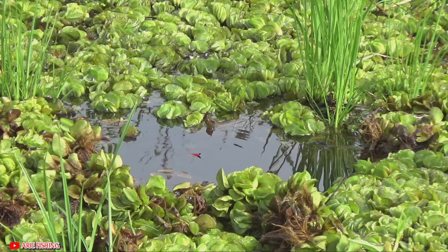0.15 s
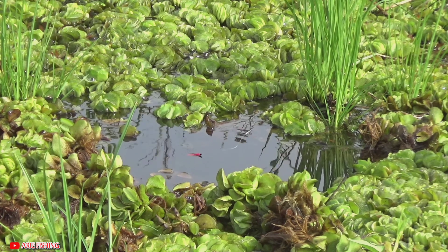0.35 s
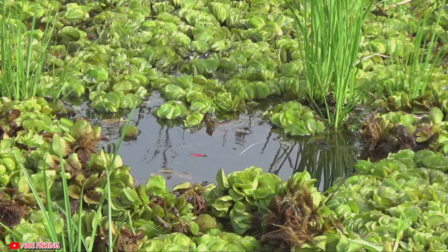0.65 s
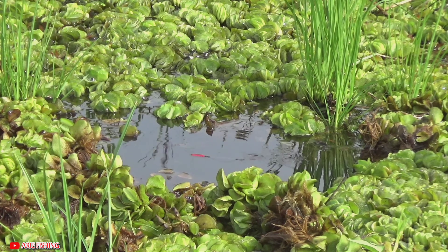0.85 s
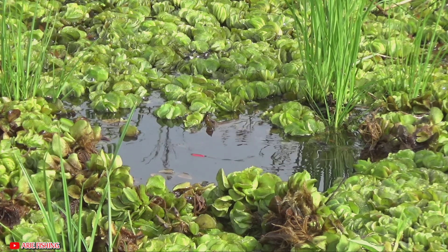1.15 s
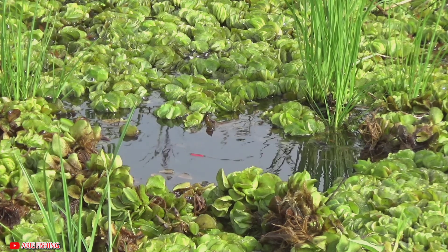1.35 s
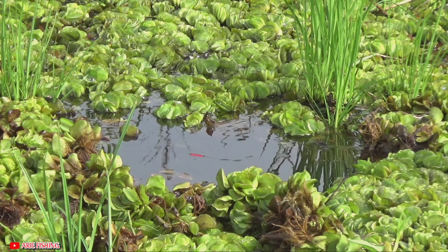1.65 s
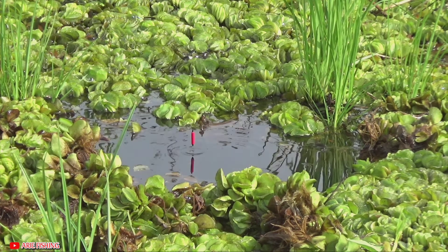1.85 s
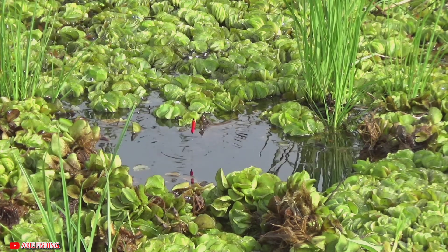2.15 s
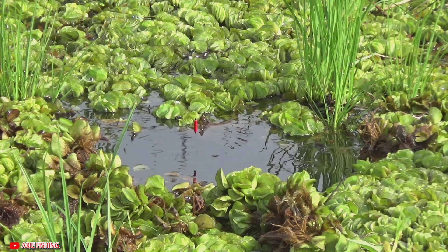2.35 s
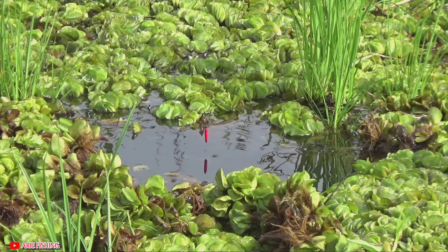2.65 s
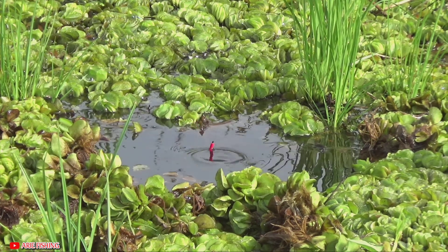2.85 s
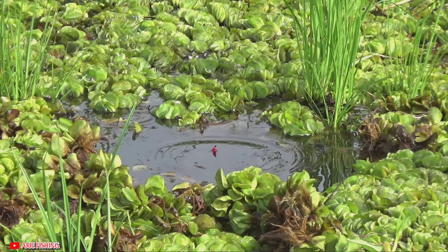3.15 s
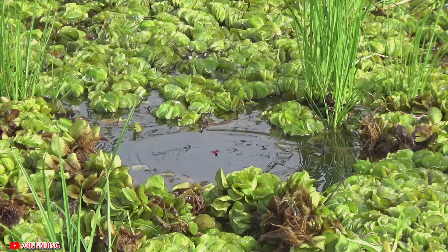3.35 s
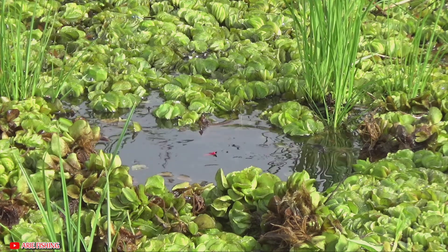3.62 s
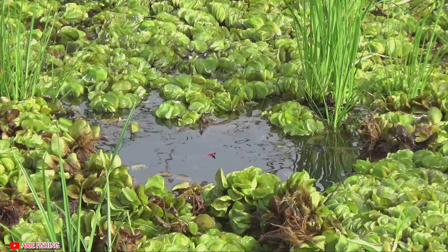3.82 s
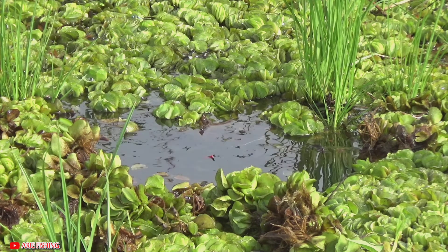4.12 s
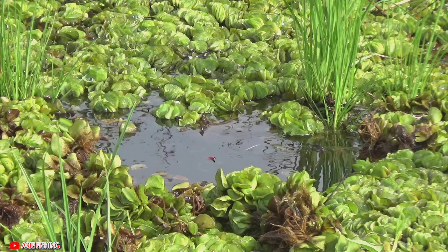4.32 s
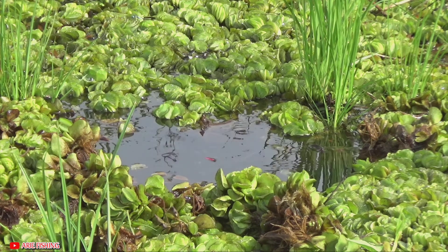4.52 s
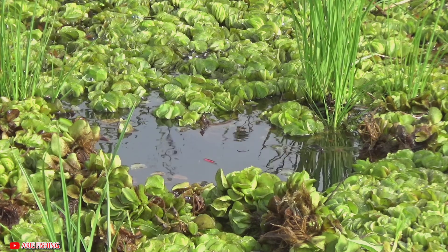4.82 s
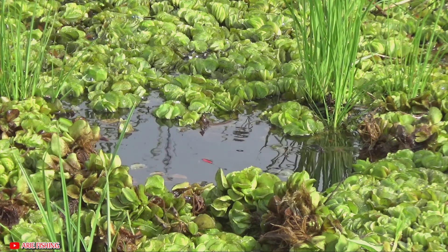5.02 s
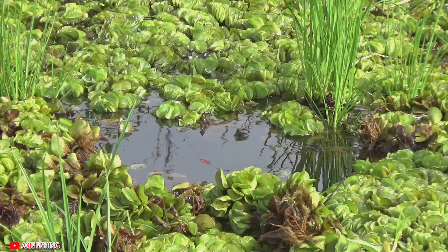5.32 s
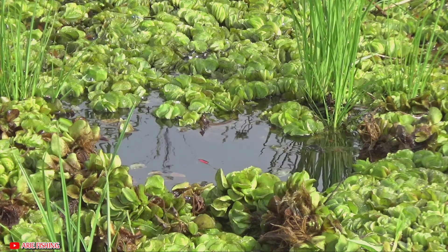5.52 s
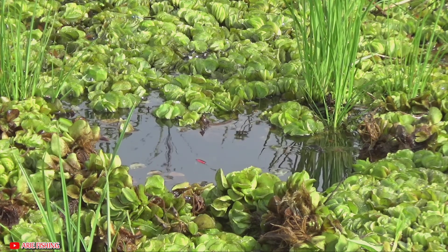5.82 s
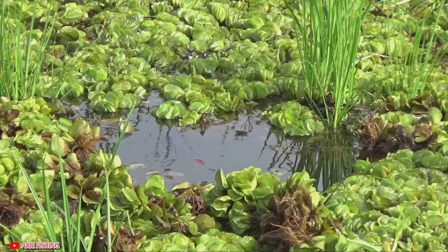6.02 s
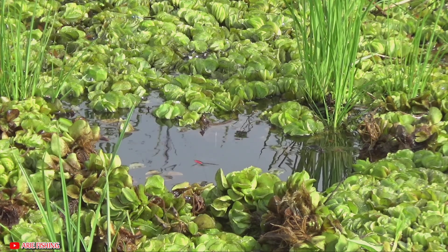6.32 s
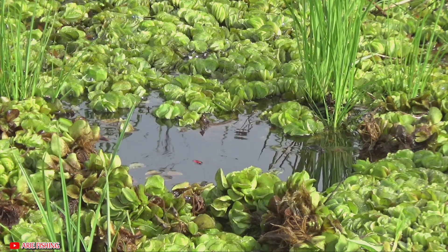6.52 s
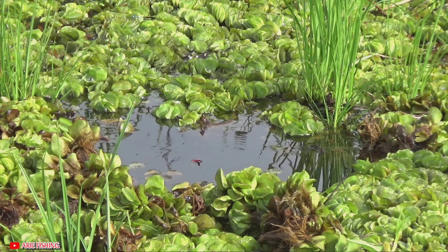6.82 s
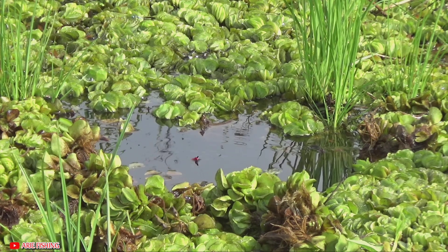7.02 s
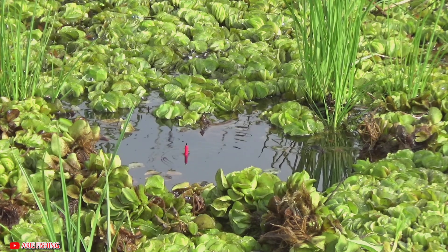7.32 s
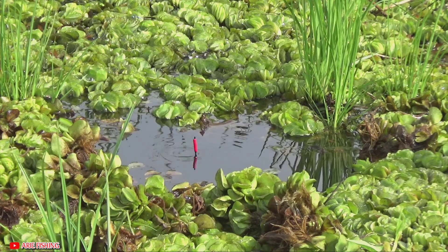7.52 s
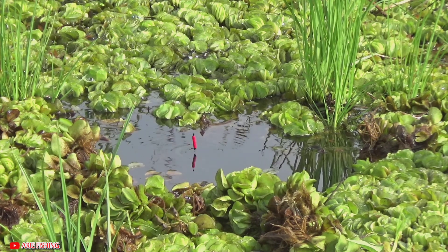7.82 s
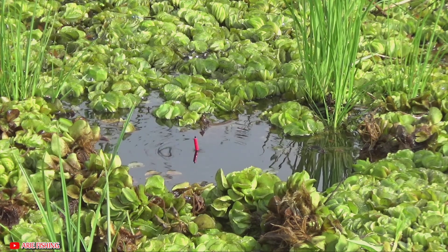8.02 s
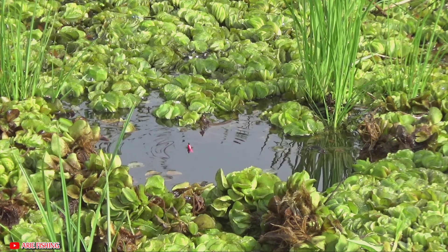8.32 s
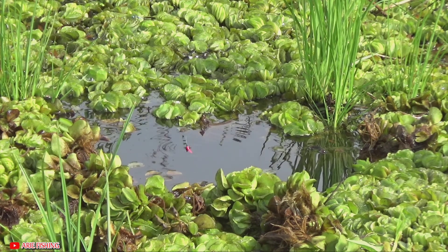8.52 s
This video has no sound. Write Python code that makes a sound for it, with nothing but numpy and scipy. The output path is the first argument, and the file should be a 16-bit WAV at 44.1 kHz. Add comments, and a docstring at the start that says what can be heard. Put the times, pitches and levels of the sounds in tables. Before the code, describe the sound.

Crickets chirp throughout beside a pond, two near ones pulsing very high at about eight chirps a second over a fluttering chorus and a soft open-air hush. A distant high trill drops out from about 3 to 7 seconds. The nearest cricket fades back around 6 seconds and builds again by 8. A bird gives four short falling whistles in the first 2 seconds, mixed with other birds' scooping calls, raspy notes and a quick descending run of chips. The whistle returns more softly from 4 seconds, repeating roughly every 0.6 seconds. Thin, faraway piping notes are scattered from about 2 seconds on. Light, sharp ticks come near 2, 2.8, 3.4 and 7 seconds, and faint, brief leaf rustles near 1.4 and 5.5. A few soft, low microphone bumps fall between 7.3 and 8 seconds.

```python
"""A weedy pond by day

Bush crickets chirp high and fast in the reeds, scraping a file that drives a resonant wing: two near
ones over a far trill and a chorus. A bird repeats a falling whistle, loud at first and then softer;
others warble and pipe further off. Light ticks, rustles, soft bumps on the microphone and the hush
of open country lie underneath."""
import sys
import numpy as np
from scipy import signal
from scipy.fft import rfft, irfft, next_fast_len
from scipy.io import wavfile
from scipy.ndimage import map_coordinates

SR = 44100
rng = np.random.default_rng(int(sys.argv[2]) if len(sys.argv) > 2 else 0)


def wrap_up_sound(samples):
    """Save the sound to the file named by the first command line argument, as 16-bit audio."""
    columns = np.atleast_2d(samples).T
    # keep every value between -1 and 1, then stretch to whole-number steps
    tamed = np.clip(columns, -1, 1)
    steps = np.round(tamed * 32767).astype(np.int16)
    wavfile.write(sys.argv[1], SR, steps)


N = 382347
TIME_S = np.arange(N) / SR


def amp(db):
    """The decibel scale: amplitude grows tenfold for every 20 dB."""
    return 10 ** (np.asarray(db) / 20)


def unit(x):
    """Normalisation to an rms amplitude of 1."""
    return x / np.sqrt(np.mean(x ** 2) + 1e-20)


def along(points, hz):
    """Interpolation of (frequency, value) points on a logarithmic frequency axis."""
    knots_hz, values = np.transpose(points)
    return np.interp(np.log(hz + 1), np.log(knots_hz + 1), values)


def wobble(rate_hz):
    """Smooth random modulation: a spline through rate_hz Gaussian values a second."""
    knots = rng.standard_normal(int(N * rate_hz / SR) + 4)
    return map_coordinates(knots, [TIME_S * rate_hz])


def filtered(x, response):
    """Linear filtering: the spectrum is multiplied by a frequency response."""
    size = next_fast_len(N + SR // 2)
    return irfft(rfft(x, size) * response(np.fft.rfftfreq(size, 1 / SR)), size)[..., :N]


def resonance(drive, hz, width_hz):
    """A damped resonator, such as a wing membrane, favours one frequency; the output has rms 1."""
    return unit(filtered(drive, lambda f: 1j * f * width_hz / (hz * hz - f * f + 1j * f * width_hz)))


def tone(hz):
    """Frequency modulation: the phase of a sine is the integral of its pitch contour."""
    return np.sin(2 * np.pi * np.cumsum(hz) / SR)


def add(track, start_s, sound):
    """Superposition: a sound adds to the track from its onset."""
    start = int(np.clip(round(start_s * SR), 0, N))
    track[start:start + len(sound)] += sound[:N - start]


def panned(x, pan_db):
    """A level difference between the channels gives direction; positive is left."""
    return x * amp([[pan_db / 2], [-pan_db / 2]])


def placed(x, t60_s, wet_db, pan_db):
    """Scattering: leaves add a different decaying tail to the direct sound in each channel."""
    t = np.arange(SR // 2) / SR
    tail = rng.standard_normal((2, len(t))) * amp(-60 * t / t60_s)
    tail /= np.linalg.norm(tail, axis=1, keepdims=True)
    scatter = signal.fftconvolve(x[None], tail, axes=1)[:, :N]
    return panned((x + amp(wet_db) * scatter) / np.hypot(1, amp(wet_db)), pan_db)


def air():
    """Partial coherence: the hush is alike on both sides in bass and top treble, diffuse between."""
    # spectrum of the open air: frequency_hz, relative_density_db
    spectrum = [(20, -22), (35, -14.5), (55, -8.5), (100, -8.5), (200, -4.5), (400, 1), (900, 2.5),
                (1400, 0), (2400, -2), (3200, -3.5), (4800, -7), (8000, -5.5), (12000, -9), (15500, -14)]
    # likeness of left and right: frequency_hz, correlation
    coherence = [(50, .995), (100, 0.98), (180, 0.83), (350, 0.38), (700, -0.081), (1500, -0.095),
                 (3000, 0.43), (6000, 0.38), (10000, 1), (11500, 1)]

    def mid_side(hz):
        """Power divides between sum and difference according to the correlation."""
        angle = np.arccos(np.clip(along(coherence, hz), -1, 1)) / 2
        return amp(along(spectrum, hz)) * [np.cos(angle), np.sin(angle)]

    mid, side = filtered(rng.standard_normal((2, N)), mid_side)
    return amp(-53.5 + .11 * wobble(2.43)) * unit(np.array([mid + side, mid - side]))


def taps(rows, t60_s, attack_s):
    """Heavy damping: each tap rings for only a few cycles."""
    track, t = np.zeros(N), np.arange(SR // 4) / SR
    for start_s, level_db, pitch_hz in rows:
        envelope = amp(level_db - 60 * t / t60_s) * (1 - np.exp(-t / attack_s))
        add(track, start_s, envelope * np.sin(2 * np.pi * pitch_hz * t))
    return track


def bumps():
    """Soft bumps on the microphone excite low, damped oscillations."""
    # bumps: start_s, level_db, pitch_hz
    impacts = [(7.318, -45, 79), (7.48, -53, 60), (7.77, -59.5, 48), (7.95, -54, 55)]
    return taps(impacts, t60_s=.043, attack_s=.0038)


def rustles():
    """Amplitude-modulated noise: brief crackly hisses in the leaves."""
    # dry rustles: start_s, length_s, level_db
    bursts = [(1.393, .06, -54), (5.539, 0.047, -55)]
    swell = np.zeros(N)
    for start_s, length_s, level_db in bursts:
        add(swell, start_s, amp(level_db) * np.hanning(int(length_s * SR)))
    crackle = resonance(rng.standard_normal(N) * amp(6.1 * wobble(400)), hz=5500, width_hz=2800)
    return placed(swell * crackle, t60_s=.046, wet_db=-11, pan_db=0)


def ticks():
    """Transients: oscillations that die within milliseconds are heard as light ticks."""
    # ticks by the water: start_s, level_db, pitch_hz
    clicks = [(1.9785, -30, 2800), (2.7993, -30, 2830), (3.4225, -30.5, 2570), (6.9992, -34, 2820)]
    return placed(taps(clicks, t60_s=.0043, attack_s=.000092), t60_s=.063, wet_db=-1.5, pan_db=1)


def note(length_s, start_hz, end_hz, arch_hz=0):
    """A bird's note is a frequency glide, which may arch upward on the way."""
    progress = np.linspace(0, 1, int(length_s * SR))
    arch = np.abs(np.sin(np.pi * progress))
    return arch ** .25 * tone(start_hz + (end_hz - start_hz) * progress + arch_hz * arch)


def pipers():
    """Far birds pipe thin, nearly pure tones, blurred by reverberation."""
    # piping notes: start_s, length_s, start_hz, end_hz, level_db
    pipes = [(1.77, 0.27, 3016, 2964, -59), (3.45, .43, 3072, 3036, -60), (4.96, 0.19, 3080, 3040, -67),
             (5.17, .055, 5200, 4950, -64), (5.35, .04, 2970, 3730, -59), (6.99, .2, 2824, 2840, -64.5),
             (7.44, .28, 3050, 2994, -65), (8.52, 0.11, 2760, 2770, -58.5)]
    # arched notes: start_s, level_db
    arches = [(2.5, -60), (4.4, -53.5), (5.485, -57), (8.3, -63.5)]
    song = np.zeros(N)
    for start_s, length_s, start_hz, end_hz, level_db in pipes:
        add(song, start_s, amp(level_db) * note(length_s, start_hz, end_hz))
    for start_s, level_db in arches:
        add(song, start_s, amp(level_db) * note(length_s=.117, start_hz=3236, end_hz=3236, arch_hz=140))
    return placed(song * amp(wobble(80)), t60_s=.41, wet_db=-3.5, pan_db=3)


def chips(count=12, first_s=.845, every_s=.09, first_hz=2935, sag_hz_per_s=534, fall_hz=400):
    """Quick downward sweeps in an even run that sinks in pitch as it swells and fades."""
    song = np.zeros(N)
    for k, from_middle in enumerate(np.linspace(-1, 1, count)):
        hz = first_hz - sag_hz_per_s * k * every_s
        chip = note(length_s=.0227, start_hz=hz + fall_hz / 2, end_hz=hz - fall_hz / 2)
        add(song, first_s + k * every_s, amp(-52.5 - 2 * from_middle ** 2) * chip)
    return song


def warblers(call_s=.075):
    """Birds on the bank modulate their pitch: smoothly in chips and scoops, noisily in hoarse slurs."""
    # scooping calls: start_s, level_db
    scoops = [(.378, -53), (1.023, -51), (1.651, -50.5), (6.86, -62)]
    # contour of one scoop: length_fraction, pitch_hz, gain_db
    contour = [(0, 2464, -8), (.15, 2198, -1.5), (.3, 1952, -2), (.48, 1723, -6), (.65, 2000, -3),
               (.82, 2380, 3), (.92, 2350, 2.5), (1, 2480, -18)]
    # hoarse slurs: start_s, level_db
    slurs = [(.11, -60), (.275, -64), (1.071, -62), (1.22, -58), (1.36, -58), (1.52, -58.5), (2.11, -64)]
    song = chips()
    progress = np.linspace(0, 1, int(call_s * SR))
    fraction, pitch_hz, gain_db = np.transpose(contour)
    scoop = amp(np.interp(progress, fraction, gain_db)) * tone(np.interp(progress, fraction, pitch_hz))
    for start_s, level_db in scoops:
        add(song, start_s, amp(level_db) * scoop)
    slur_hz = 3450 + 550 * np.sin(5 * progress + .37)
    for start_s, level_db in slurs:
        rasp_hz = 165 * wobble(690)[:len(progress)]
        add(song, start_s, amp(level_db) * np.sin(np.pi * progress) * tone(slur_hz + rasp_hz))
    return placed(song * amp(3 * wobble(150)), t60_s=.53, wet_db=-4.5, pan_db=7)


def whistler(floor_hz=2500, sag_hz=125, hook_hz=109, echo_s=.095):
    """A pure tone sinks ever more slowly, swells and stops short; trees across the pond reflect it."""
    # falling whistles in two bouts: start_s, length_s, level_db
    whistles = [(.005, .19, -47.5), (0.641, 0.21, -48.5), (1.295, 0.18, -47.5), (1.912, 0.138, -51),
                (3.97, .2, -63), (4.589, .19, -63.5), (5.211, 0.22, -60.5), (5.85, .21, -58.5),
                (6.49, .185, -56), (7.119, .19, -55), (7.761, 0.2, -58.5), (8.452, .2, -64)]
    song = np.zeros(N)
    for start_s, length_s, level_db in whistles:
        progress = np.linspace(0, 1, int(length_s * SR))
        glide_hz = floor_hz + sag_hz * np.exp(-progress / .5) + hook_hz * np.exp(-progress / .04)
        waver_hz = 3.9 * rng.standard_normal() + 9 * wobble(92)[:len(progress)]
        gate = np.minimum(1, progress / .06) * np.minimum(1, (1 - progress) / .097)
        swell = amp(level_db + 4.3 * (progress - 1))
        add(song, start_s, gate * swell * tone(glide_hz + waver_hz))
    song *= amp(1.4 * wobble(60))
    delayed = filtered(song, lambda hz: np.exp(-2j * np.pi * hz * echo_s))
    bird = placed(song, t60_s=.57, wet_db=-10, pan_db=6)
    echo = amp(-11.5 + 3 * wobble(45)) * placed(delayed, t60_s=.28, wet_db=5, pan_db=-4)
    return bird + echo


def chorus():
    """Incoherent summation: many further crickets merge into a fluttering band of noise."""
    # loudness of the massed singers: time_s, level_db
    levels = [(0, -47.5), (1.76, -46), (2.6, -48.5), (4.2, -47.5), (5.5, -47), (6.25, -50), (7, -49.6),
              (8.67, -47.5)]
    # spectrum of their wings: frequency_hz, relative_density_db
    spectrum = [(5500, -43), (6800, -19), (7350, -9), (7800, 1), (8300, -2), (9000, 4), (9600, 0),
                (10300, -15.5), (10600, -13.5), (11300, -17), (11750, -42), (14000, -40)]
    level_db = np.interp(TIME_S, *np.transpose(levels))
    flutter = amp(1.25 * wobble(330) + .33 * wobble(18))
    noise = flutter * rng.standard_normal((2, N))
    mid, side = unit(filtered(noise, lambda hz: amp(along(spectrum, hz))))
    return panned(amp(level_db) * (mid + .35 * np.array([side, -side])), pan_db=-1)


def strokes(pitch_hz, stroke_hz, sweep_hz, sharpness, roughness, scatter_db):
    """Stridulation: the scraper slows along the file, so each wing stroke falls in pitch."""
    cycle = np.cumsum(stroke_hz * (1 + .02 * wobble(12) + .04 * wobble(130))) / SR % 1
    pulse = np.sin(np.pi * cycle) ** sharpness * amp(scatter_db * wobble(140))
    phase = 2 * np.pi * np.cumsum(pitch_hz + sweep_hz * (.5 - cycle) + 90 * wobble(130)) / SR
    # uneven teeth roughen the tone
    in_phase = (1 + roughness * wobble(1000)) * np.sin(phase)
    quadrature = roughness * wobble(1000) * np.cos(phase)
    return unit(pulse * (in_phase + quadrature))


def chirp_times(first_s, chirps_per_s, jitter_s=.003):
    """Phase accumulation: a chirp comes each time the singer's tempo completes a cycle."""
    cycles = np.cumsum(chirps_per_s * np.ones(N)) / SR
    beats = np.arange(np.interp(first_s, TIME_S, cycles), cycles[-1])
    return np.interp(beats, cycles, TIME_S) + jitter_s * rng.standard_normal(len(beats))


def chirp_envelope(times_s, levels_db, width_s, scatter_db=.7):
    """Powers add: one Gaussian swell for every chirp, no two quite equally loud."""
    power = np.zeros(N)
    for centre_s, level_db in zip(times_s, levels_db + scatter_db * rng.standard_normal(len(times_s))):
        span = slice(max(0, int((centre_s - .2) * SR)), int((centre_s + .2) * SR))
        power[span] += amp(level_db) ** 2 * np.exp(-((TIME_S[span] - centre_s) / width_s) ** 2)
    return np.sqrt(power)


def high_cricket():
    """A far singer's even, high trill arrives more by scattering than by the direct path."""
    # the trill, which rests for a while: time_s, level_db
    levels = [(0, -64), (1.5, -57), (3.15, -57.5), (3.27, -75), (6.3, -75), (7, -60), (8.67, -57)]
    level_db = np.interp(TIME_S, *np.transpose(levels))
    scrape = strokes(9870, stroke_hz=150.3, sweep_hz=500, sharpness=1, roughness=.5, scatter_db=3)
    song = resonance(scrape, hz=9870, width_hz=390)
    return placed(amp(level_db) * song, t60_s=.08, wet_db=3, pan_db=-2)


def low_cricket():
    """Forced resonance of one wing mode: a lower, very even chirper, deeper in the leaves."""
    # loudness of its chirps: time_s, level_db
    levels = [(0, -50.5), (4, -51), (6.3, -53.3), (8.67, -51.5)]
    times_s = chirp_times(first_s=.043, chirps_per_s=8.69)
    swell = chirp_envelope(times_s, np.interp(times_s, *np.transpose(levels)), width_s=.027)
    scrape = strokes(7930, stroke_hz=141.1, sweep_hz=830, sharpness=.61, roughness=.3, scatter_db=2)
    song = resonance(scrape, hz=7934, width_hz=330)
    return placed(song * swell, t60_s=.06, wet_db=-5, pan_db=0)


def near_cricket(upper_lead_s=.018):
    """Two wing modes: each chirp of the nearest singer starts on the upper and settles on the main."""
    # its tempo: time_s, chirps_per_s
    tempo = [(0, 7.45), (1.2, 8.34), (2.3, 8.41), (3.3, 7.91), (4.4, 8.15), (5.7, 7.39), (7, 8.24),
             (8.67, 8.74)]
    # its effort, which breaks off and slowly builds again: time_s, level_db, upper_mode_offset_db
    effort = [(0, -44, -12), (.8, -46, -7), (1.85, -45.5, -2.5), (2.47, -46, -7), (2.6, -49.5, -10),
              (3.4, -47.5, -10), (3.8, -47.5, -5), (4.7, -46.5, -2), (5.5, -47, 0), (5.77, -46, -7),
              (5.88, -58, -6), (6.8, -55.5, -4), (8.149, -46.5, -8), (8.67, -46.5, -4)]
    times_s = chirp_times(first_s=.021, chirps_per_s=np.interp(TIME_S, *np.transpose(tempo)))
    knots_s, level_db, offset_db = np.transpose(effort)
    main_db = np.interp(times_s, knots_s, level_db)
    upper_db = np.interp(times_s, knots_s, level_db + offset_db)
    main = chirp_envelope(times_s, main_db, width_s=.034)
    upper = chirp_envelope(times_s - upper_lead_s, upper_db, width_s=.034)
    # harder strokes run faster along the file and so reach the upper mode
    upper_share = upper ** 2 / (main ** 2 + upper ** 2 + 1e-12)
    pitch_hz = 8900 + 680 * upper_share
    scrape = strokes(pitch_hz, stroke_hz=132.5, sweep_hz=1870, sharpness=2.5, roughness=.22, scatter_db=1)
    song = main * resonance(scrape, hz=9100, width_hz=520)
    song += .81 * upper * resonance(scrape, hz=9700, width_hz=360)
    return placed(song, t60_s=.076, wet_db=-7.5, pan_db=1.7)


def scene():
    """Superposition of independent sources: insects in front, birds behind, air all round."""
    insects = near_cricket() + low_cricket() + high_cricket() + chorus()
    birds = whistler() + warblers() + pipers()
    return insects + birds + ticks() + rustles() + bumps() + air()


def record(dry):
    """Band limiting: an ideal low-pass filter removes the highest treble."""
    return filtered(dry, lambda hz: hz < 15500)


dry = scene()
out = record(dry)
wrap_up_sound(out)
```